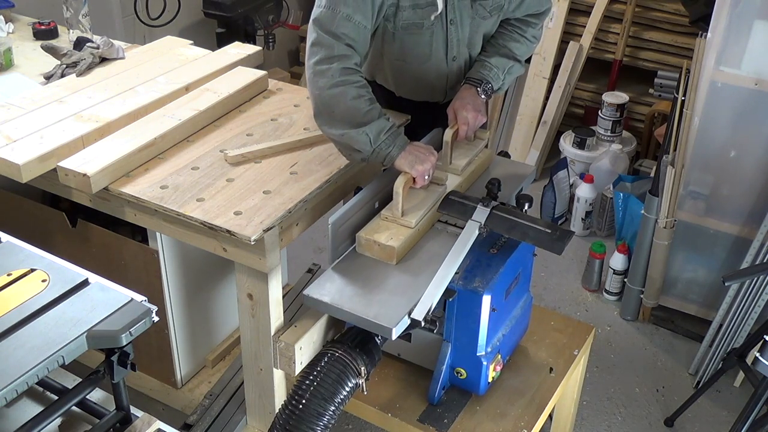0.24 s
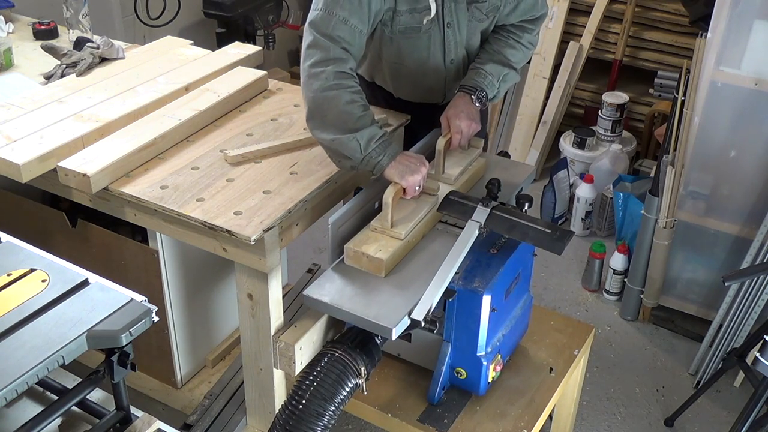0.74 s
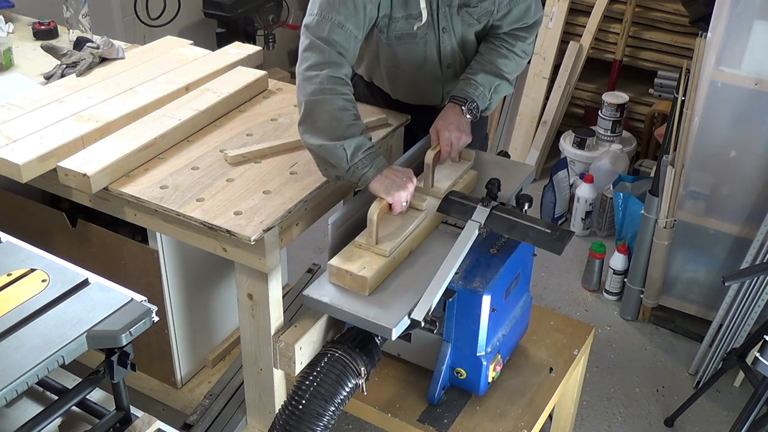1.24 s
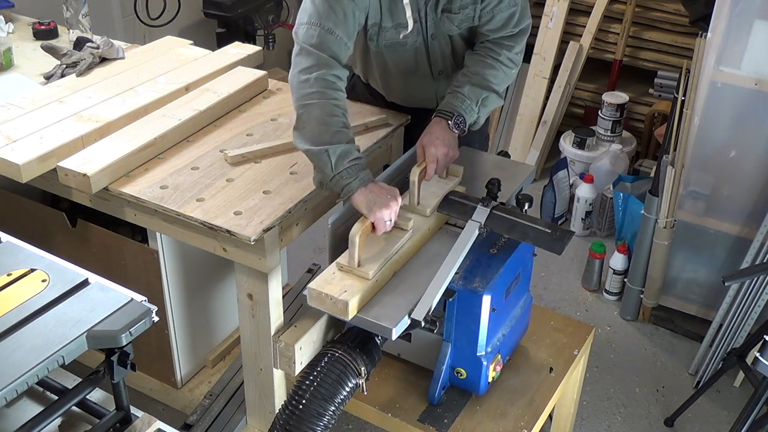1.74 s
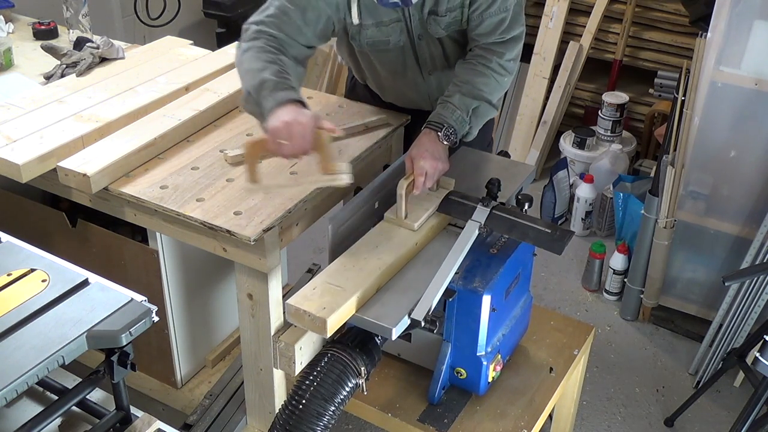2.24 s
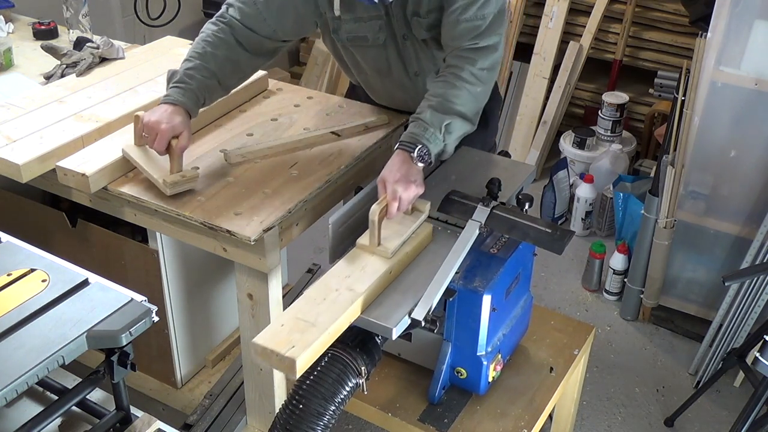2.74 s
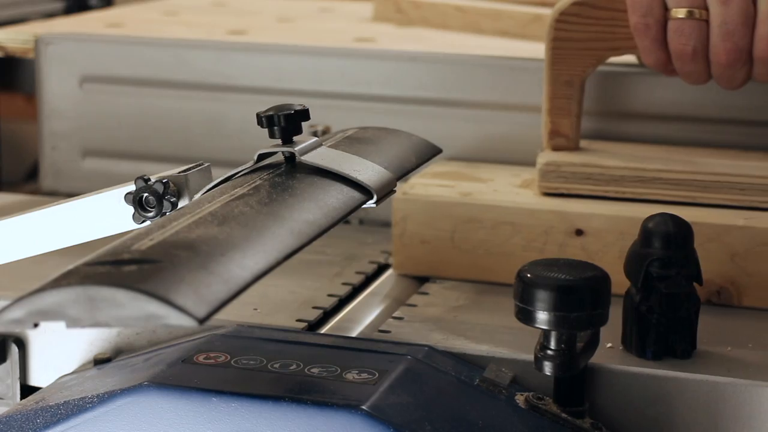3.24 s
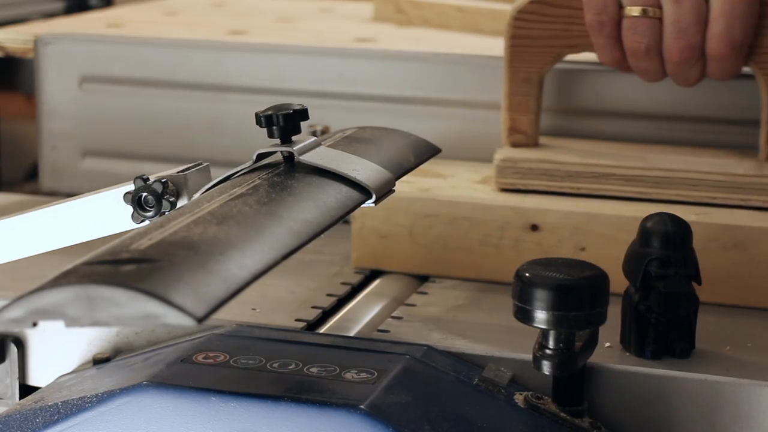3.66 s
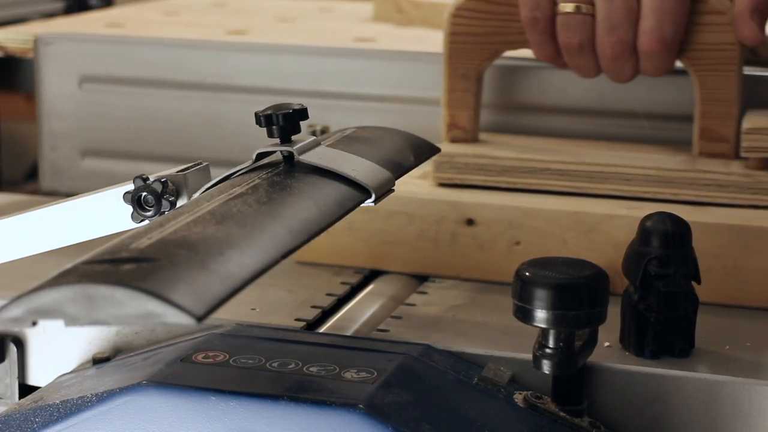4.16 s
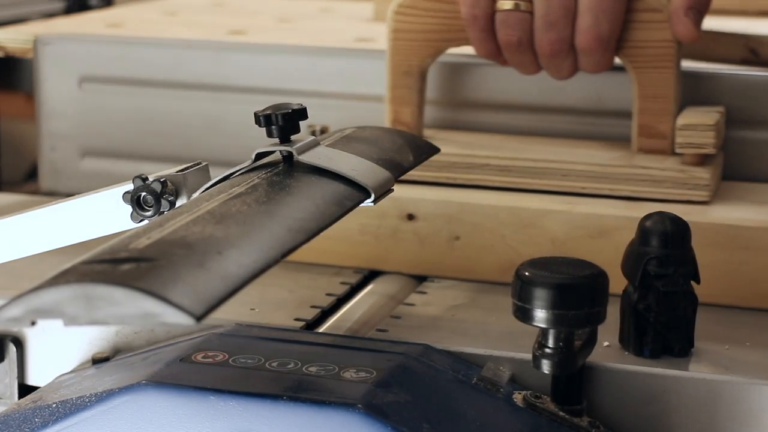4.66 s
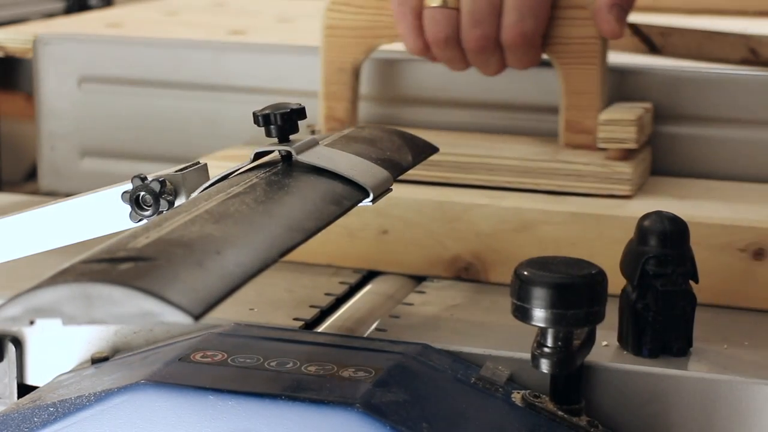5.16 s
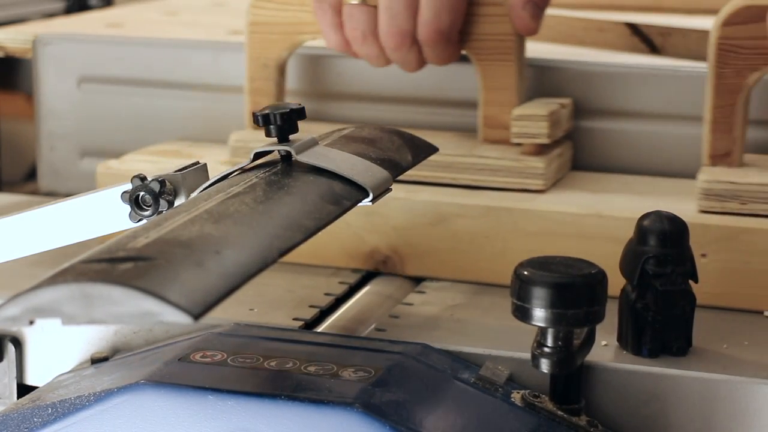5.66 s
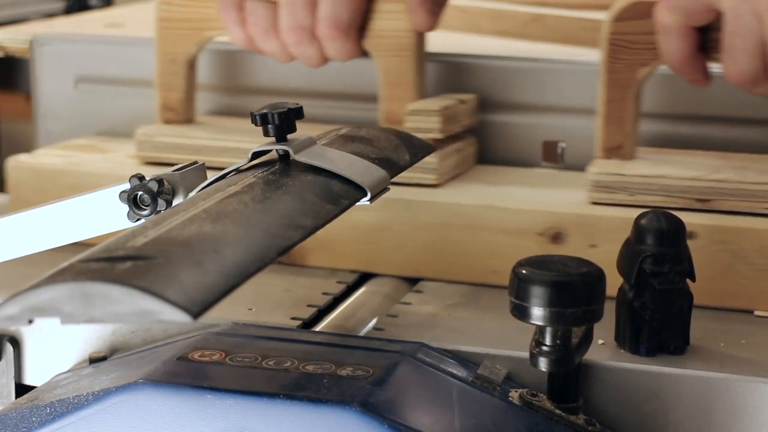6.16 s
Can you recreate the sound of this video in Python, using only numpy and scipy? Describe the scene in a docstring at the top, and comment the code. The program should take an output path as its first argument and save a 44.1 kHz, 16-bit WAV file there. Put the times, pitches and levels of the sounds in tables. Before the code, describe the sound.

A coarse, motor-driven wood-cutting buzz comes first, heard from across the bench with slight room reflection and a high steady fan whine. Its bright spray fades before the board clears the knives, leaving fluttering air and an upward hoot. Then the sound drops nearly to nothing and a close, drier, central cut gradually builds, its pitch sagging slightly, with splintery bursts and sharp little ticks near the end.

```python
"""A buzzing rasp comes first: a benchtop jointer planes a board across the bench, beside a whining extractor.
The rasp stops in a rush of air and a rising hoot at the open slot; a second pass fades in by the guard.
Two knives strike periodically, so each cut is noise bursts plus partials of the knife rate, coloured by
the board and housing. Shaped noise makes the air, and sines the fan; the motor slows under the cut."""
import sys
import numpy as np
from scipy import signal
from scipy.fft import rfft, irfft
from scipy.io import wavfile

SR = 44100
rng = np.random.default_rng(int(sys.argv[2]) if len(sys.argv) > 2 else 0)


def bounce(signal):
    """Save signal as a 16-bit WAV file at the path given by the first command-line argument."""
    frames = np.transpose(np.atleast_2d(signal))
    limited = np.clip(frames, -1, 1)
    pcm = np.round(limited * 32767).astype(np.int16)
    wavfile.write(sys.argv[1], SR, pcm)


N = 283122
TIME = np.arange(N) / SR
BINS = np.fft.rfftfreq(N, 1 / SR)
# the board leaves the knives and uncovers the slot
BOARD_ENDS_S, RUN_OUT_S = 2.55, 0.035
FAR_ENDS_S, NEAR_STARTS_S = 3.19, 3.21
NEAR_FADE_S = 2.79
BELT_RATIO = 1.16  # motor turns per knife blow


# Colour of board, tables and housing. Each row: frequency in Hz, relative gain in dB.
FAR_BODY = [(60, -37), (170, -23.5), (270, -3.5), (370, -7), (560, 1), (850, 3.5), (1300, -0.5), (1800, -1),
            (2400, -1.5), (3700, -3.5), (6000, -4.5), (10000, -6.5), (13000, -15.5), (15500, -34)]
# Partials of the cut across the bench; half multiples come from the uneven knives, 16.25 is the motor's
# whine. Each row: multiple of the knife rate, top level in dB, dip between tops in dB,
# time of a top in seconds, seconds between tops.
FAR_PARTIALS = [(1, -45.5, 10.5, 1.31, 2.27), (2, -41.5, 8, 1.83, 1.9), (3, -39.5, 9.5, 2.33, 3.2),
                (4, -43.5, 8, 0.77, 7), (5, -43, 7, 0.15, 2.37), (5.5, -44.5, 14, 0.51, 3.6),
                (6, -44.5, 29, 2.35, 3.5), (7, -48, 17, 0.61, 3.08), (8, -45, 18, 3, 3.5),
                (9, -46, 6.5, 1.64, 1.4), (9.5, -49.5, 10, 1.64, 1.64), (10, -49.5, 11, 1.61, 0.92),
                (11, -47, 40, 0.046, 2.81), (16.25, -45.5, 14, 1.38, 2.2)]


def far_pass(blow_db=-36.0, blow_drop_db=2.5, tear_db=-36.5, tear_drop_db=10.0,
             spray_db=-40.5, spray_drop_db=16):
    """Superposition of cutting layers: the spray dies away, the blows soften, then the tearing weakens."""
    speed = far_speed()
    levels_db = (blow_db - blow_drop_db * step(1.48, 0.081),
                 tear_db - tear_drop_db * step(2.09, 0.24),
                 spray_db - spray_drop_db * step(1.37, 0.27))
    cut = cutting(speed, levels_db, FAR_BODY, uneven=0.13, buzz_db=-10.0, edge_db=-5.5,
                  smears=(.45, 2.5, 2.5), grit_db=6.0, patchy_db=3.5, wobble_db=1.0)
    turns = np.cumsum(speed) / SR
    cut += singing(turns, FAR_PARTIALS, waver=0.03, blur=1.2 + step(0.55, 0.084))
    cut += amp(-55) * tone(BELT_RATIO * speed, waver=0.16)  # motor hum
    board_present = 1 - step(BOARD_ENDS_S, RUN_OUT_S)
    return cut * amp(grain()) * board_present + air() + gap()


# Knife rate of the second pass, two knives a turn. Each row: time in seconds, rate in Hz.
NEAR_SPEED = [(3.2, 277.6), (3.48, 264.2), (3.74, 257.3), (4.0, 252.9), (4.39, 249.8), (4.68, 249.7),
              (5.25, 245.9), (5.57, 245.5), (5.81, 243.3), (6.06, 236.1), (6.42, 236.2)]
# Colour of board, tables and housing by the guard. Each row: frequency in Hz, relative gain in dB.
NEAR_BODY = [(60, -47), (170, -22), (290, -4.5), (400, -3.5), (850, 3), (1200, 0), (1800, -5), (3200, -5.5),
             (5200, -9), (8200, -7), (11000, -19), (13500, -15.5), (15500, -27)]
# Partials of the cut by the guard; 16.25 is the motor's whine. Each row: multiple of the knife rate,
# top level in dB, dip between tops in dB, time of a top in seconds, seconds between tops.
NEAR_PARTIALS = [(1, -45.5, 18, 4.21, 6.1), (1.5, -50, 11, 3.86, 2.58), (2, -44, 9.3, 4.46, 3.2),
                 (2.5, -44, 8.6, 5.06, 2.4), (3, -46.5, 6.2, 5.95, 3.2), (3.5, -45.5, 6.7, 6.57, 1.6),
                 (4, -43, 7, 5.5, 1.5), (5, -48, 5.6, 6.14, 1.74), (6, -46, 21, 4.63, 1.05),
                 (8, -49.5, 12, 5.94, 1), (9, -51, 27, 5.44, 0.75), (10, -44.5, 20, 5.34, 2.57),
                 (13, -48, 9.9, 4.88, 3.1), (16.25, -53, 11, 5.4, 2.3), (20, -45, 38, 4.5, 2.2)]
# Extractor fan by the guard. Each row: time in seconds, blade tone level before the fade-in in dB.
NEAR_FAN = [(3.2, -52), (5.6, -47)]


def near_pass(blow_db=-37, tear_db=-37.0, tear_drop_db=2, spray_db=-44.5, spray_drop_db=5,
              late_patchy_db=7.0, fade_power=0.92, motor_db=-49.0, motor_drop_db=9):
    """Superposition under a slow fade-in: late in the cut the treble turns patchy, then it all turns duller."""
    speed, = curves(NEAR_SPEED)
    turns = np.cumsum(speed) / SR
    dull = step(6.1, 0.025)
    levels_db = (blow_db, tear_db - tear_drop_db * dull, spray_db - spray_drop_db * dull)
    patchy_db = 1.0 + late_patchy_db * step(5.87, 0.21)
    cut = cutting(speed, levels_db, NEAR_BODY, uneven=.3, buzz_db=-7, edge_db=-5.5, smears=(.9, .8, .35),
                  grit_db=1.0, patchy_db=patchy_db, wobble_db=0.0)
    cut += singing(turns, NEAR_PARTIALS, waver=0.02, blur=0.87)
    motor_level_db = motor_db - motor_drop_db * step(4.95, 0.17)
    cut += amp(motor_level_db) * tone(BELT_RATIO * speed, waver=0.12)
    extractor = fan(curves(NEAR_FAN)[0], hz=4319, octave_db=-12, waver_hz=1.62, shaft_db=-66.0)
    fade_in = np.clip((TIME - NEAR_STARTS_S) / NEAR_FADE_S, 0, 1) ** fade_power
    return fade_in * (cut * amp(grain()) + extractor) + splinters(turns) + shaft(turns)


# Knife rate of the first pass under load, two knives a turn. Each row: time in seconds, rate in Hz.
FAR_SPEED = [(0, 232), (.2, 233.1), (.34, 230.2), (.7, 227.7), (.97, 229.7), (1.38, 231), (1.77, 232.2),
             (2.1, 234.3), (2.55, 233.7)]


def far_speed(idle_hz=282, spin_up_s=1):
    """Motor under load: the cut holds the knife rate down; once freed it nears idle exponentially."""
    speed, = curves(FAR_SPEED)
    free_s = np.maximum(TIME - BOARD_ENDS_S, 0)
    return speed + (idle_hz - speed) * (1 - np.exp(-free_s / spin_up_s))


def cutting(speed, levels_db, body, uneven, buzz_db, edge_db, smears, grit_db, patchy_db, wobble_db):
    """Periodic impact excitation: each knife thumps, tears and flings chips; echoes fill the gaps."""
    turns = np.cumsum(speed) / SR  # counts knife blows
    knife = np.floor(turns).astype(int)
    blow_change_db = .9 * rng.standard_normal(N)[knife]
    bite = (1 + uneven * (-1) ** knife) * amp(blow_change_db)
    burst = unit(bite * np.exp(-(turns % 1) / 1.55))
    thump_noise, tear_noise, spray_noise, grit = rng.standard_normal((4, N))
    thump_smear, tear_smear, spray_smear = smears  # steady part added to the bursts
    buzz = blows(turns, uneven, ring_s=0.005)

    colour = spectrum(body)
    low = 1 / (1 + (BINS / 2000) ** 8)
    high = 1 - 1 / (1 + (BINS / 6500) ** 12)
    thump = unit((thump_smear + burst) * thump_noise) + amp(buzz_db) * buzz
    thump = filtered(thump, colour * np.sqrt(low))
    tear = unit((tear_smear + burst) * tear_noise) + amp(edge_db) * buzz
    tear = patchy(filtered(tear, colour * np.sqrt((1 - low) * (1 - high))), 1.2)
    spray = (spray_smear + burst) * spray_noise * amp(grit_db * grit)
    spray = patchy(filtered(spray, colour * np.sqrt(high)), patchy_db)
    mix = sum(amp(db) * unit(x) for db, x in zip(levels_db, (thump, tear, spray)))
    return amp(wobble_db * drift(30)) * shifting_bands(mix)


def blows(turns, uneven, ring_s, count=11):
    """Impulse response: each knife, one set higher, rings dense upper modes that change as the board slides."""
    knife = np.floor(turns)
    hits = np.diff(knife, prepend=0) * (1 + uneven * (-1) ** knife)
    t = np.arange(SR // 32) / SR
    out = np.zeros(N)
    for place in range(count):
        response = unit(rng.standard_normal(len(t)) * np.exp(-t / ring_s))
        offset = np.clip(TIME / TIME[-1] * (count - 1) - place, -1, 1)
        # equal-power crossfade from place to place
        out += np.cos(np.pi / 2 * offset) * signal.oaconvolve(hits, response)[:N]
    return unit(filtered(out, np.minimum(BINS / 1500, 1)))


# Brief swells of single partials; the one at 3750 Hz lifts the motor's whine.
# Each row: time in seconds, 1/e half length in seconds, frequency in Hz, gain in dB.
PARTIAL_SWELLS = [(0.187, 0.31, 695, 9.5), (0.282, 0.072, 925, 7), (0.285, 0.087, 1850, 12.5),
                  (0.36, 0.15, 3750, 14.5), (0.765, 0.12, 910, 8), (1.705, 0.29, 2310, 8),
                  (3.333, 0.1, 820, 13), (4.616, .17, 3245, 7.5), (5.346, 0.15, 2460, 3.5),
                  (5.88, 0.14, 1200, 10.5), (5.96, 0.097, 1930, 5), (5.884, 0.12, 725, 9)]


def singing(turns, partials, waver, blur, swell_width_hz=86):
    """Harmonic synthesis: partials of the knife rate rise and dip periodically, and some swell briefly."""
    flutter = drift(18) + 1j * drift(18)
    out = np.zeros(N)
    speed = np.gradient(turns) * SR
    swells = [(hz / speed[round(s * SR)], db * swell(s, half)) for s, half, hz, db in PARTIAL_SWELLS]
    for multiple, db, dip_db, top_s, period_s in partials:
        dip = np.sin(np.pi * (TIME - top_s) / period_s) ** 2
        shake = np.roll(flutter, rng.integers(N))
        order = np.round(multiple * 4) / 4
        swell_db = sum(gain * np.exp(-((order - at) * speed.mean() / swell_width_hz) ** 2)
                       for at, gain in swells)
        # bending waves spread each blow in time; no blur is a sharp rasp
        phase = 2 * np.pi * order * turns + blur * np.sin(order ** 2)
        wave = np.exp(1j * phase) * (1 + waver * order * shake)  # high partials are rougher
        out += amp(db - dip_db * dip + swell_db) * np.sqrt(2) * wave.real
    return out


# Broad bands of the cutting noise that grow stronger (+) or weaker (-) for a while. Each row: time in
# seconds, 1/e half length in seconds, frequency in Hz, 1/e half width in octaves, gain in dB.
NOISE_BANDS = [(0.15, 0.25, 744, 0.7, -2.5), (0.05, 0.22, 2620, 0.21, 1), (0.782, 0.26, 1350, 0.2, 3.5),
               (1.15, 0.086, 685, 0.14, 5.5), (1.7, 0.18, 1550, 0.58, -3.5), (1.82, 0.28, 6400, 0.42, -6.5),
               (2.224, 0.12, 3100, 0.38, -8.5)]


def shifting_bands(x):
    """Time-varying filtering: broad bands of the cutting noise grow stronger or weaker for a while."""
    hz, t, z = signal.stft(x, SR, nperseg=1024)
    db = 0
    for s, half, at, width, gain in NOISE_BANDS:
        octaves = np.log2((hz[:, None] + 1) / at)
        db = db + gain * np.exp(-((t - s) / half) ** 2 - (octaves / width) ** 2)
    return signal.istft(z * amp(db), nperseg=1024)[1][:N]


# Hard (+) and soft (-) places in the wood.
# Each row: time in seconds, 1/e half length in seconds, level change in dB.
WOOD_GRAIN = [(1.8, 0.045, 1.5), (2.13, 0.017, -4), (2.248, 0.13, 1), (4.844, 0.15, 1.5),
              (5.053, 0.1, -0.5), (5.26, 0.088, 1.4), (5.883, 0.099, 1)]


def grain():
    """Variable cutting force: the level change in dB as hard and soft wood meets the knives."""
    return sum(db * swell(s, half) for s, half, db in WOOD_GRAIN)


# Hard spots where the higher knife shatters the grain.
# Each row: time in seconds, 1/e half length in seconds, peak level in dB.
HARD_SPOTS = [(5.844, 0.056, -44), (6.142, .05, -53)]


def splinters(turns, hz=13800, width_hz=1100):
    """Amplitude-modulated band noise: a bright spit of shattered wood once a turn."""
    spit = rng.standard_normal(N) * np.exp(-(turns % 2))
    spit = unit(filtered(spit, 1 / (1 + ((BINS - hz) / width_hz) ** 2)))
    return spit * sum(amp(db) * swell(s, half) for s, half, db in HARD_SPOTS)


# Chips that strike the guard. Each row: time in seconds, peak level in dB, ring frequency in Hz.
CHIP_STRIKES = [(3.809, -37, 3100), (4.979, -33, 8000), (6.038, -30, 5500), (6.157, -31.5, 7700),
                (6.235, -33, 6970)]


def chips(decay_s=0.004):
    """Impact and damped resonance: single chips tick against the guard."""
    out = np.zeros(N)
    for s, db, hz in CHIP_STRIKES:
        decay = np.exp(-np.minimum(abs(TIME - s) / decay_s, 20))
        tick = rng.standard_normal(N) * (TIME >= s) * decay
        tick = filtered(tick, np.minimum(BINS / hz, 1) / (1 + ((BINS - hz) / (0.12 * hz)) ** 2))
        out += amp(db) * tick / abs(tick).max()
    return out


def shaft(turns, db=-76):
    """Rotating imbalance: the cutter block hums once a turn."""
    return amp(db) * swell(4.5, 0.87) * np.sin(np.pi * turns)


# The open slot hoots as the board draws away.
# Each row: time in seconds, octave of the knife rate in dB, motor hum in dB.
SLOT_HOOTS = [(2.53, -66, -74), (2.59, -40, -52), (2.67, -46, -51), (2.75, -36.5, -47), (2.8, -50, -55),
              (2.85, -65, -66), (2.94, -44, -72), (3.05, -59, -70), (3.19, -75, -68)]


def hoots(knife_db=-58):
    """Siren principle: the free knives chop the air in the open slot, rising with the motor."""
    speed = far_speed()
    octave_db, motor_db = curves(SLOT_HOOTS)
    siren = amp(knife_db) * tone(speed, waver=0.53)
    siren += amp(octave_db) * tone(2 * speed, waver=0.29)
    motor = amp(motor_db) * tone(BELT_RATIO * speed, waver=.15)
    return step(BOARD_ENDS_S, RUN_OUT_S) * (siren + motor)


def gap(db=-39.5, s=2.53, half_s=0.091, hz=2050, octaves_per_s=4.0, width_hz=380):
    """Swept narrow-band noise: air whistles through the gap behind the board's end, rising as it opens."""
    centre = hz * 2 ** np.clip(octaves_per_s * (TIME - s), -1, 1)
    carrier = np.exp(2j * np.pi * np.cumsum(centre) / SR)
    rush = (drift(width_hz) + 1j * drift(width_hz)) * carrier
    return amp(db) * swell(s, half_s) * unit(rush.real)


# Air drawn through the cutter slot. Each row: frequency in Hz, relative gain in dB.
SLOT_AIR = [(60, -46), (170, -18), (270, -18.5), (350, -8.5), (520, -0.5), (900, -6.5), (2000, -8),
            (2900, 1), (4100, 0.5), (5000, -11.5), (8500, -13.5), (11000, -19.5), (15500, -40)]


def air(covered_db=-45.0, open_db=-37.0, easing_db_per_s=2.5, flutter_db=2.0):
    """Turbulence noise: a fluttering rush under smooth hiss jumps up when the board uncovers the slot."""
    rush = filtered(rng.standard_normal(N), spectrum(SLOT_AIR))
    low = filtered(rush, 1 / (1 + (BINS / 6000) ** 8))
    opened = step(BOARD_ENDS_S, RUN_OUT_S)
    rise_db = open_db - covered_db - easing_db_per_s * (TIME - BOARD_ENDS_S)
    return amp(covered_db + opened * rise_db) * unit(patchy(low, flutter_db) + rush - low)


# Whistles of air at the edges of slot and guard. Each row: time in seconds, 1/e half length in seconds,
# frequency in Hz, width in Hz between the points 24 dB down, peak level in dB.
EDGE_WHISTLES = [(1.98, 0.18, 6000, 900, -50), (1.87, 0.2, 5150, 1300, -50), (1.7, 0.24, 2180, 500, -47),
                 (2.68, .1, 3850, 800, -44), (2.8, 0.05, 4020, 200, -41), (3.16, 0.03, 4350, 1000, -40),
                 (3.8, 0.33, 3080, 300, -56)]


def whistles():
    """Resonance driven by air noise: narrow bands come and go with the board's place."""
    noise = rfft(rng.standard_normal(N))
    out = np.zeros(N)
    for s, half, hz, width, db in EDGE_WHISTLES:
        band = irfft(noise / (1 + ((BINS - hz) / (0.13 * width)) ** 2), N)
        out += amp(db) * swell(s, half) * unit(band)
    return out


# Extractor fan across the bench. Each row: time in seconds, blade tone level in dB.
FAR_FAN = [(0, -46), (1.5, -43.5), (2.4, -50.5), (3.2, -45)]


def extractor_far(fan_left_db=-6, slot_left_db=-3.5):
    """Level-difference panning: the fan's whine and the slot's hoots, both from the right."""
    whine = fan(curves(FAR_FAN)[0], hz=4146, octave_db=-46, waver_hz=1.16, shaft_db=-59.5)
    return panned(whine, fan_left_db) + panned(hoots(), slot_left_db)


def fan(level_db, hz, octave_db, waver_hz, shaft_db, blade_count=9):
    """Blade-passing tone: a slightly wavering whine, its octave and the hum of the shaft."""
    phase = 2 * np.pi * np.cumsum(hz + waver_hz * drift(9.0)) / SR
    blades = np.sin(phase) + amp(octave_db) * np.sin(2 * phase)
    blades = amp(level_db + 0.7 * drift(9)) * blades
    return np.sqrt(2) * (blades + amp(shaft_db) * np.sin(phase / blade_count))


# Stereo colour across the bench. Each row: frequency in Hz, left minus right in dB.
FAR_BALANCE = [(60, 21), (150, 4), (228, 21.5), (280, 6), (380, -4), (470, -0.5), (700, 2), (1290, -1.5),
               (2380, 0), (4200, -2.5), (7000, -3.5)]


def across_bench(x, wall_db=-21, room_db=-23, room_s=0.025):
    """Reflection and reverberation: a wall echo and a short room ring widen all but the treble."""
    below = 1 / (1 + (BINS / 5200) ** 10)
    side = spectrum(FAR_BALANCE) ** below
    ring = rng.standard_normal(N) * np.exp(-np.minimum(TIME / room_s, 20))
    wall = amp(wall_db) * np.exp(-2j * np.pi * BINS * .007)  # 7 ms late
    room = amp(room_db) * rfft(ring / np.linalg.norm(ring))
    wide = filtered(x, (wall + room) * below)
    left = filtered(x, 2 * side / (1 + side)) + wide
    right = filtered(x, 2 / (1 + side)) - wide
    return np.array([left, right])


def panned(x, left_db):
    """Level-difference panning: the left is louder than the right by left_db."""
    ratio = amp(left_db)
    return np.array([2 * ratio / (1 + ratio) * x, 2 / (1 + ratio) * x])


def tone(hz, waver):
    """Random modulation: a slightly unsteady sine of rms 1 that follows hz."""
    shake = drift(31) + 1j * drift(19)
    carrier = np.exp(2j * np.pi * np.cumsum(hz * np.ones(N)) / SR)
    return unit(((1 + waver * shake) * carrier).real)


def patchy(x, depth_db, size=(9, 10)):
    """Random spectral modulation: patches flare and fade at constant mean power; depth may vary in time."""
    _, s, z = signal.stft(x, SR, nperseg=512)
    blob = np.outer(*map(np.hanning, size))
    patches = unit(signal.convolve2d(rng.standard_normal(z.shape), blob, "same"))
    depth = np.interp(s, TIME, depth_db * np.ones(N))
    gain_db = depth * patches - depth ** 2 * np.log(10) / 20
    return signal.istft(z * amp(gain_db), nperseg=512)[1][:N]


def drift(rate):
    """Low-pass noise: smooth chance of rms 1 that changes about rate times a second."""
    return unit(filtered(rng.standard_normal(N), np.exp(-(BINS / rate) ** 2)))


def swell(s, half):
    """Gaussian envelope: a bell-shaped rise and fall around time s."""
    return np.exp(-np.minimum(((TIME - s) / half) ** 2, 50))


def step(s, width):
    """Sigmoid envelope: a smooth change from 0 to 1 around time s."""
    return .5 + .5 * np.tanh((TIME - s) / (2 * width))


def curves(rows):
    """Linear interpolation: the columns of a table joined by straight lines in time."""
    s, *columns = np.transpose(rows)
    return [np.interp(TIME, s, c) for c in columns]


def spectrum(points):
    """Frequency response: a gain for every frequency from (Hz, dB) points."""
    hz, db = np.transpose(points)
    return amp(np.interp(np.log(BINS + 1), np.log(hz), db))


def filtered(x, gain):
    """Linear filtering: applies a gain for every frequency."""
    return irfft(rfft(x) * gain, N)


def amp(db):
    """Logarithmic level: decibels to gain."""
    return 10 ** (np.asarray(db) / 20)


def unit(x):
    """Mean-square normalisation: scales to rms 1."""
    return x / np.sqrt(np.mean(abs(x) ** 2) + 1e-20)


def scene():
    """Superposition: the far pass in stereo, a brief gap, then the near pass in the middle."""
    small = whistles() + chips()
    fade_out = np.exp(-np.clip((TIME - FAR_ENDS_S) / .005, 0, 20))
    far = across_bench(far_pass() + small) + extractor_far()
    near = near_pass() + small
    return far * fade_out + near * (TIME > NEAR_STARTS_S)


def record(dry, edge_hz=15700):
    """Band limiting: a steep low-pass filter removes the highest treble."""
    low_pass = signal.firwin(511, edge_hz, window=("kaiser", 9), fs=SR)
    return signal.oaconvolve(dry, low_pass[None], "same")


dry = scene()
out = record(dry)
bounce(out)
```